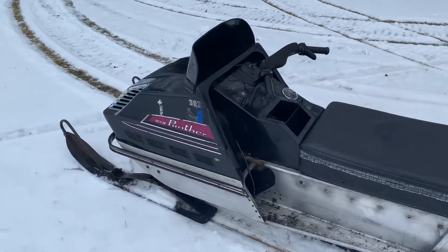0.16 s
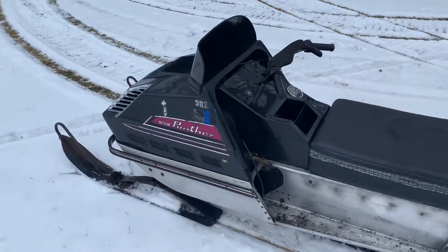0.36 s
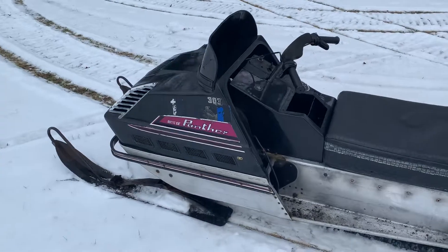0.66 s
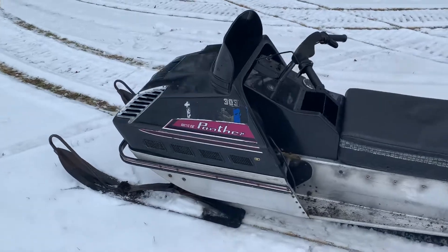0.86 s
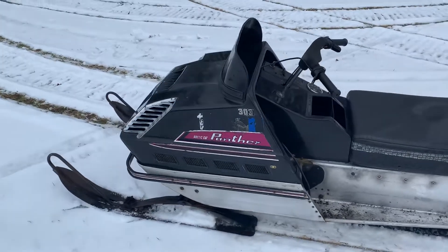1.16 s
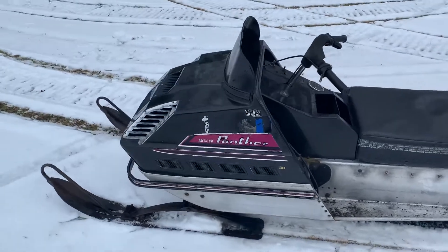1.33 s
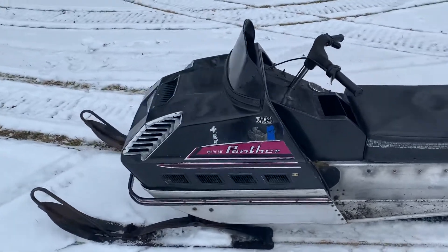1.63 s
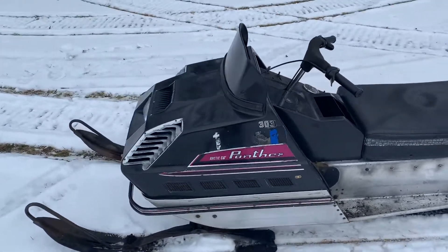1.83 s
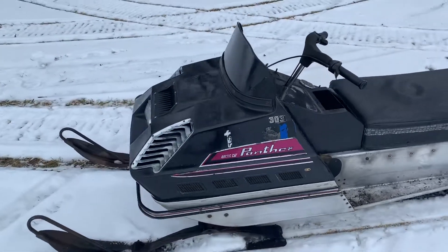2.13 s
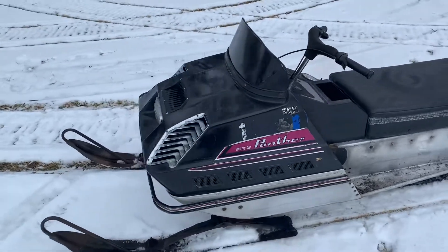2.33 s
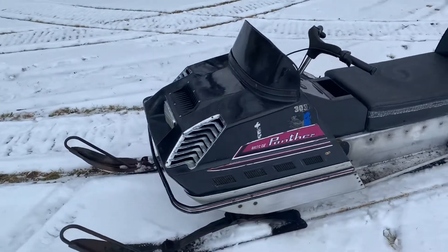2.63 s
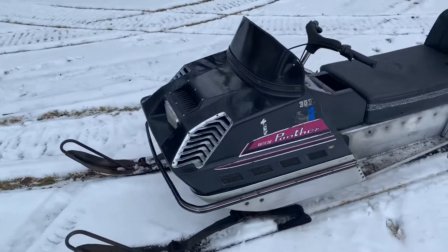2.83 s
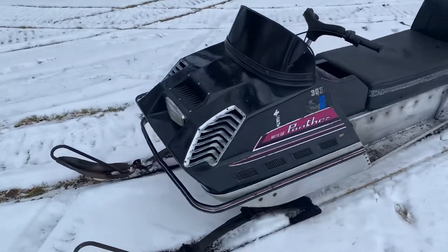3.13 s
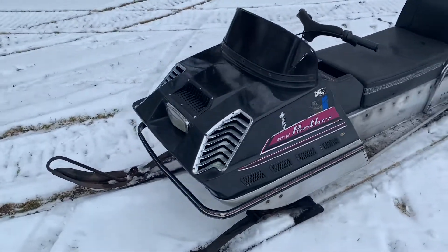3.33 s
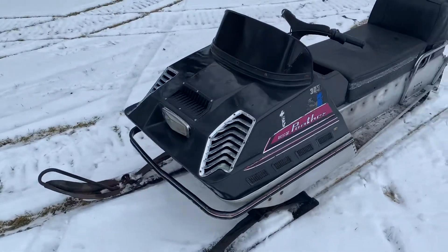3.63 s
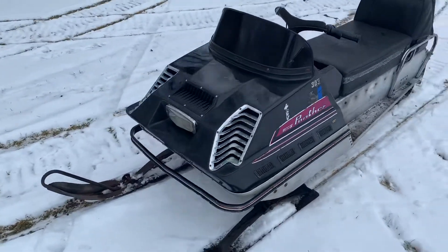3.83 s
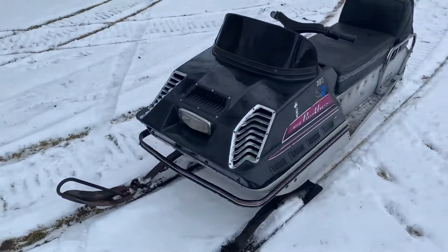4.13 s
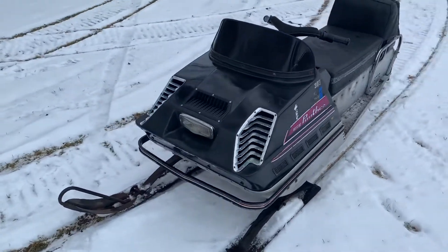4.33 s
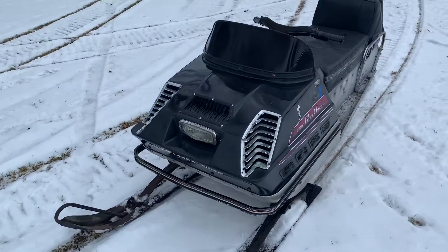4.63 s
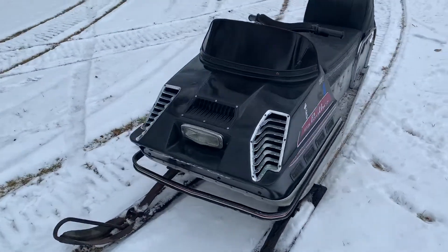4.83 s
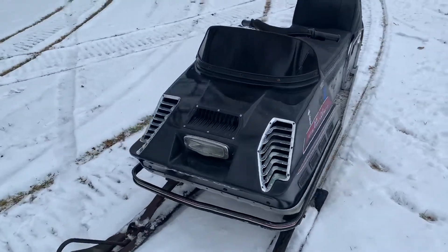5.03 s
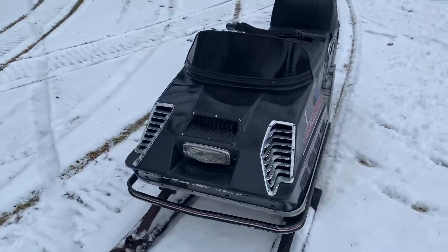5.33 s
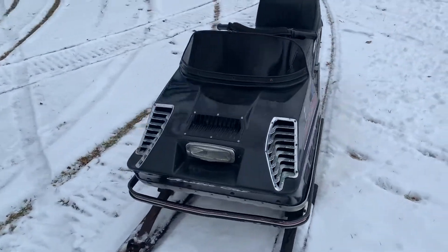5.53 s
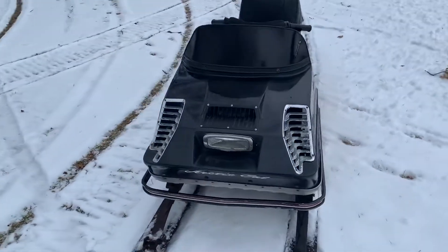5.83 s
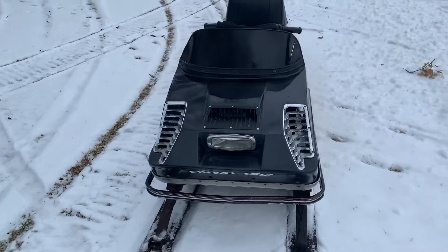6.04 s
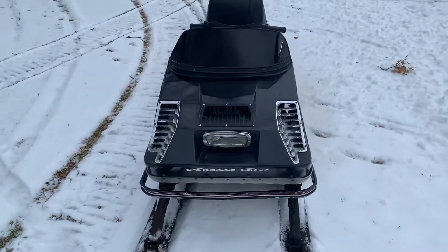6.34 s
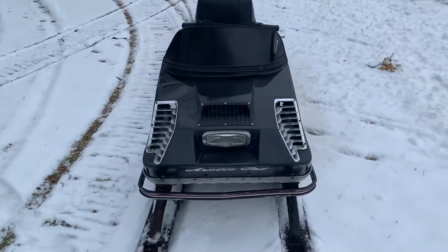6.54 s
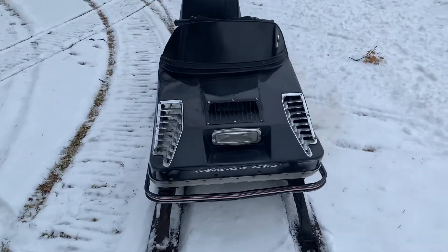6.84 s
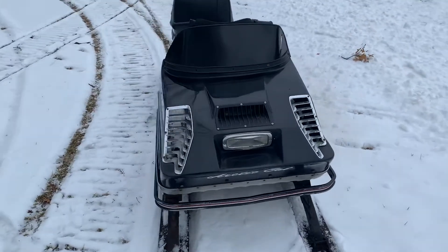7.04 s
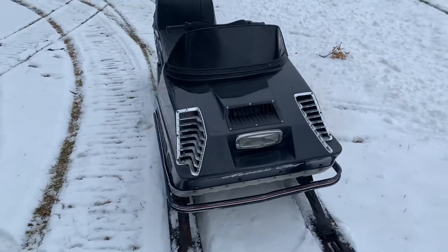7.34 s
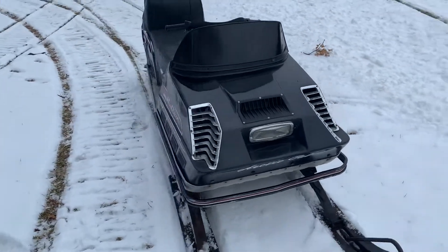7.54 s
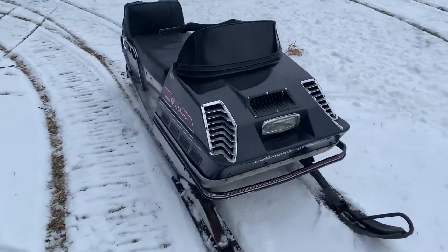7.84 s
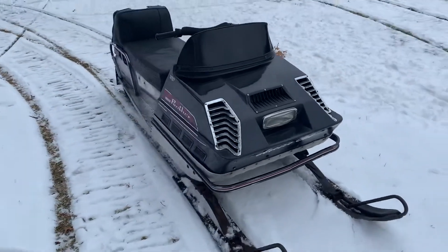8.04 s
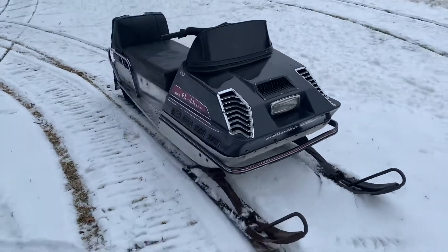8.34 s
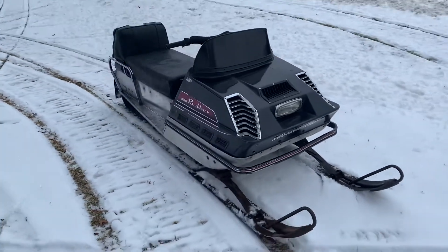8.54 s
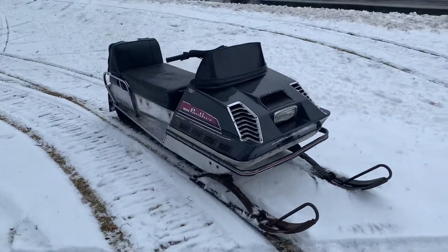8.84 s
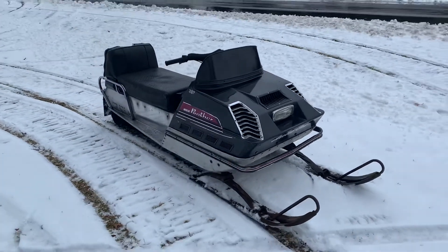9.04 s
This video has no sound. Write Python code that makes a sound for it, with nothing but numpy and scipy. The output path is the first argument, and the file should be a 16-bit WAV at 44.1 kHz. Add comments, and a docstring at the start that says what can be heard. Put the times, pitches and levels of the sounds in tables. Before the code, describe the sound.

A two-stroke snowmobile idles unevenly outdoors, firing in quick paired thumps with sharp exhaust cracks, rattling metal and a brief early wind gust.

```python
"""On open snow a two-stroke snowmobile idles while the listener walks round its nose with a stereo microphone.
The crank turns about 32 times a second, but the cylinder fires two or three turns in a row and then coasts.
Each firing rings the muffler with a thump and sends a sharp crack of gas out of the exhaust; coasting turns puff.
Hood and fins rattle in resonances knocked on every turn, a clutch plate sings in spells, the fan hisses,
a steady low rumble lies underneath, and an early gust of noise and popping eddies hits the microphone."""
import sys
import numpy as np
from scipy import signal
from scipy.fft import rfft, irfft
from scipy.io import wavfile
from scipy.ndimage import uniform_filter1d, map_coordinates

SR = 44100
rng = np.random.default_rng(int(sys.argv[2]) if len(sys.argv) > 2 else 0)


def transcribe(signal):
    """Save signal, clipped to [-1, 1], as a 16-bit WAV file at the path in sys.argv[1]."""
    frames = np.atleast_2d(signal).T
    limited = np.clip(frames, -1, 1)
    pcm = np.round(limited * 32767).astype(np.int16)
    wavfile.write(sys.argv[1], SR, pcm)


N = 404838
TIME_S = np.arange(N) / SR
TURN_S = .0315  # nominal time of one turn of the crank


def from_db(db):
    """Amplitude factor of a level in dB."""
    return 10 ** (np.asarray(db) / 20)


def rms_one(x):
    """Scale to an rms of 1, over both channels together."""
    return x / np.sqrt(np.mean(x ** 2) + 1e-20)


def in_time(rows):
    """Each column as a curve over all samples."""
    s, *columns = np.transpose(rows)
    return [np.interp(TIME_S, s, c) for c in columns]


def at_hz(rows, hz):
    """Each column read on a log-frequency axis."""
    points, *columns = np.transpose(rows)
    return [np.interp(np.log(hz + 1e-9), np.log(points), c) for c in columns]


def panned(left_db):
    """Gains of the left and right channel, left_db apart."""
    return from_db(np.array([[.5], [-.5]]) * left_db)


def two_channels(mid, side, alike):
    """Two channels that correlate by the given likeness, from two independent signals."""
    alike = np.clip(alike, 0, 1)
    return np.sqrt(1 + alike) * mid + np.sqrt(1 - alike) * side * [[1], [-1]]


def clicks(times, sizes):
    """Single-sample kicks."""
    out = np.zeros(N)
    samples = np.clip(np.round(times * SR).astype(int), 0, N - 1)
    np.add.at(out, samples, sizes)
    return out


def ring(kicks, hz, t60):
    """A unit kick sets a sine of about height 1 ringing, down 60 dB after t60 seconds."""
    r = np.exp(-np.log(1000) / (t60 * SR))
    w = 2 * np.pi * hz / SR
    return signal.lfilter([0, np.sin(w)], [1, -2 * r * np.cos(w), r * r], kicks + 1e-18)


def resonate(x, hz, width_hz):
    """A resonance with gain 1 on its top."""
    r = np.exp(-np.pi * width_hz / SR)
    zeros = np.array([1, 0, -1]) * (1 - r * r) / 2
    return signal.lfilter(zeros, [1, -2 * r * np.cos(2 * np.pi * hz / SR), r * r], x)


def wobble(per_s):
    """Random drift of rms 1, in straight lines between per_s knots a second."""
    knots = rng.standard_normal(int(N / SR * per_s) + 3)
    return rms_one(map_coordinates(knots, [np.arange(N) * per_s / SR], order=1))


def facing(at_s, spread_s):
    """Gain of a sound that beams one way, as the listener walks through its beam."""
    return np.exp(-.5 * ((TIME_S - at_s) / spread_s) ** 2)


# the two channels of the microphone: (frequency [Hz], likeness [0-1], left minus right [dB])
STEREO = [(60, 0.91, -1.5), (320, 0.87, -1.25), (704, 0.88, 3), (1160, 0.78, 3), (1710, 0.22, 5.5),
          (3020, 0.46, -0.5), (5770, 0.24, -4.5), (7600, 0.96, 1), (9700, 1, -0.5)]
# left channel delayed by this much above this frequency
TREBLE_LAG_S, TREBLE_FROM_HZ = .000178, 6500


def noise(spectrum):
    """Coloured stereo noise of rms 1; its treble is slightly delayed in the left channel."""
    hz = np.fft.rfftfreq(N, 1 / SR)
    alike, left_db = at_hz(STEREO, hz)
    mid, side = rfft(rng.standard_normal((2, N)))
    pair = two_channels(mid, side, alike)
    pair[0] *= np.exp(-2j * np.pi * hz * TREBLE_LAG_S * (hz > TREBLE_FROM_HZ))
    colour = from_db(at_hz(spectrum, hz)[0])
    return rms_one(irfft(pair * panned(left_db) * colour, N))


# spectrum of the low rumble: (frequency [Hz], relative density [dB per Hz])
RUMBLE_SPECTRUM = [(15, -40), (30, -38), (50, 2.5), (100, -1.5), (155, -0.5), (220, -4.5), (350, -16),
                   (550, -20), (1000, -78)]


def rumble(level_db=-23):
    """Low rumble: steady coloured noise."""
    return from_db(level_db) * noise(RUMBLE_SPECTRUM)


# eddies popping on the microphone: rate, level against the gust, cycles of ring down to -60 dB
EDDIES_PER_S, EDDY_DB, EDDY_CYCLES = 80, -3.5, 5.2


def eddies(low_hz=200, high_hz=640, scatter_db=2.0, tilt_db=-4.5, count=10):
    """Short dull pops at random times on a ladder of pitches, the higher ones weaker; rms 1."""
    out = 0
    for hz, height in zip(np.geomspace(low_hz, high_hz, count), np.linspace(0, 1, count)):
        born = rng.random(N) < EDDIES_PER_S / (count * SR)
        force = from_db(tilt_db * height + scatter_db * wobble(200))
        out = out + ring(born * force, hz, EDDY_CYCLES / hz)
    return rms_one(out)


# spectrum of the wind at the microphone: (frequency [Hz], relative density [dB per Hz])
WIND_SPECTRUM = [(25, -28), (60, 6), (110, -4.5), (300, 1), (450, -5.5), (700, -12.5), (1100, -23.5),
                 (2500, -45)]
# one gust swells, eases and drops: (time [s], level before lumps [dB])
GUST_LEVEL = [(0, -33.5), (.36, -20), (.84, -16.5), (.97, -22), (1.3, -21.5), (1.7, -25), (2, -70)]


def gust(lumps_db=2.5, left_db=4.5, rush_db=-1.0):
    """Wind rushes over the microphone and buffets it with eddies, more on the left."""
    air = from_db(rush_db) * noise(WIND_SPECTRUM) + from_db(EDDY_DB) * eddies()
    strength = from_db(in_time(GUST_LEVEL)[0] + lumps_db * wobble(55.2))
    return strength * air * panned(left_db)


# spectrum of the cooling fan: (frequency [Hz], relative density [dB per Hz])
FAN_SPECTRUM = [(300, 0.5), (550, -6), (900, 2.5), (1200, 2), (2100, 1), (3000, -5), (4200, -3.5),
                (5200, -13.5), (7000, -6.5), (8500, -7.5), (10500, -5), (13000, -18.5), (15500, -18)]
# the fan heard on the walk: (time [s], level before flutter [dB])
FAN_LEVEL = [(0, -31), (1.2, -36), (2.4, -32), (4.8, -31), (6.6, -34), (9.18, -32)]


def fan(flutter_db=1.15):
    """Cooling air and belt hiss: coloured noise with a fast flutter."""
    return from_db(in_time(FAN_LEVEL)[0] + flutter_db * wobble(280)) * noise(FAN_SPECTRUM)


def rattle(turns, modes, scatter_db, pan_db, count):
    """Loose metal knocks count times on every turn; each knock excites the modes anew; rms 1."""
    times = (turns[:, None] + TURN_S * rng.random((len(turns), count))).ravel()
    force_db = scatter_db * rng.standard_normal(len(times))
    out = 0
    for hz, mode_db, t60 in modes:
        alike, left_db = at_hz(STEREO, hz)
        mid, side = rng.standard_normal((len(times), 2)).T
        sizes = two_channels(mid, side, alike) * from_db(force_db + mode_db)
        kicks = np.array([clicks(times, channel) for channel in sizes])
        out = out + ring(kicks, hz, t60) * panned(left_db + pan_db)
    return rms_one(out)


# hood panels: (frequency [Hz], relative level [dB], t60 [s])
HOOD_MODES = [(631, -2.5, 0.069), (697.5, -2.5, 0.17), (729, -0.5, 0.16), (1079, -7.5, 0.092),
              (1367, -5, 0.044)]
# the hood panels heard on the walk: (time [s], level [dB])
HOOD_LEVEL = [(0, -31), (1.5, -36), (2.3, -35), (3.2, -42), (4.6, -32), (5.8, -34), (7.4, -31), (8.1, -38)]
# lower drone of the nose, heard only from the front: (frequency [Hz], relative level [dB], t60 [s])
NOSE_MODES = [(631, 0.5, 0.067), (679, 1, .06)]
# cooling fins: (frequency [Hz], relative level [dB], t60 [s])
FIN_MODES = [(1700, 1.5, 0.064), (1810, 1, 0.034), (1930, 3.5, 0.066), (2232, 7, 0.028),
             (2760, -1.5, 0.083), (2927, -0.5, 0.06), (3310, -9.5, 0.16)]
# the cooling fins heard on the walk: (time [s], level [dB])
FINS_LEVEL = [(0, -35.5), (2.2, -40.5), (4.9, -34.5), (5.8, -37.5), (6.6, -36.5), (7.9, -42.5),
              (9.18, -42.5)]


def clatter(turns, nose_db=-35.5):
    """Hood, nose and cooling fins rattle with every turn of the crank."""
    hood = rattle(turns, HOOD_MODES, scatter_db=1.5, pan_db=-2.0, count=6)
    nose = rattle(turns, NOSE_MODES, scatter_db=1.0, pan_db=-2.0, count=6)
    fins = rattle(turns, FIN_MODES, scatter_db=2.5, pan_db=-1.0, count=8)
    hood = from_db(in_time(HOOD_LEVEL)[0]) * hood
    nose = from_db(nose_db) * facing(at_s=7.1, spread_s=0.67) * nose
    fins = from_db(in_time(FINS_LEVEL)[0]) * fins
    return hood + nose + fins


# spells in which a clutch plate sings: (start [s], end [s], level before flutter and choking [dB])
CLUTCH_SPELLS = [(0, 0.885, -37), (1.696, 2.3, -37), (2.793, 3.015, -31.5), (3.293, 3.753, -35.5),
                 (4, 7.4, -43)]
# the singing swells and fades at this rate round each spell
CLUTCH_FADE_DB_PER_S = 59


def clutch(jet, hz=1826, waver_hz=13, flutter_db=3.0, choke=18, left_db=6.0):
    """The belt rubs a plate into a wavering ring, choked by the jerk of each firing."""
    spells = []
    for start, end, level_db in CLUTCH_SPELLS:
        outside_s = abs(TIME_S - np.clip(TIME_S, start, end))
        spells.append(level_db - CLUTCH_FADE_DB_PER_S * outside_s)
    spells_db = np.max(spells, axis=0)
    phase = 2 * np.pi * np.cumsum(hz + waver_hz * wobble(90)) / SR
    slack = 1 / (1 + choke * uniform_filter1d(jet, size=1300))  # averaged over about 29 ms
    return from_db(spells_db + flutter_db * wobble(60)) * slack * np.sin(phase) * panned(left_db)


# speed of the crank, hunting round its idle: (time [s], speed [turns per minute])
CRANK_SPEED = [(0.0, 1894), (0.44, 1894), (0.69, 2001), (1.47, 1889), (2.12, 1986), (2.57, 1942),
               (2.77, 2000), (3.78, 1934), (3.9, 1873), (4.82, 2003), (5.09, 1933), (6.32, 2018),
               (6.44, 1932), (7.41, 1838), (7.63, 1940), (7.76, 1810), (7.98, 1939), (9.18, 1982)]
FIRST_TURN_S = .0096


def crank_turns():
    """Times at which the piston opens the exhaust port, once a turn."""
    angle = np.cumsum(in_time(CRANK_SPEED)[0]) / (60 * SR)  # in turns
    angle = angle - np.interp(FIRST_TURN_S, TIME_S, angle)
    return np.interp(np.arange(0, angle[-1]), angle, TIME_S)


# cycles in which the engine stumbles:
# (time [s], firing turns [count], coasting turns [count], charge of the last firing [dB])
STUMBLES = [(.01, 3, 3, 0), (.2, 3, 3, 0), (.85, 2, 4, 0), (3.49, 3, 3, -1), (3.67, 3, 3, 0),
            (3.86, 3, 3, 0), (4.97, 3, 2, -6), (6.81, 3, 3, -2), (7, 3, 3, 0), (7.19, 3, 2, -9),
            (7.35, 3, 3, 0), (7.55, 3, 2, -5), (8.94, 3, 3, -11)]
# the idle cycle: turns that fire, then turns that coast
FIRE_TURNS, COAST_TURNS = 2, 3


def charges(turns):
    """Charge burnt on each turn in dB, none while coasting: the idle cycle repeats unless the engine stumbles."""
    out = []
    while len(out) < len(turns):
        now_s = turns[len(out)]
        stumble = [row[1:] for row in STUMBLES if abs(row[0] - now_s) < TURN_S]
        fire, coast, last_db = stumble[0] if stumble else (FIRE_TURNS, COAST_TURNS, 0)
        out += [0] * (fire - 1) + [last_db] + [-np.inf] * coast
    return np.array(out[:len(turns)])


def jets(fired, crack_db, peak_s=0.0027, width_s=0.0012, tail=0.86, linger_s=.0062, sputter_db=2.0):
    """Strength of the gas jet from the exhaust port: a brief sputtering burst that lingers under the hood."""
    t = np.arange(SR // 10) / SR
    burst = np.exp(-.5 * ((t - peak_s) / width_s) ** 2)
    linger = tail * np.exp(-t / linger_s) * (1 - np.exp(-(t / peak_s) ** 2))
    flow = signal.oaconvolve(clicks(fired, from_db(crack_db)), np.hypot(burst, linger))[:N]
    return flow * from_db(sputter_db * wobble(900))


# spectrum of the exhaust jet: (frequency [Hz], relative density [dB per Hz])
CRACK_SPECTRUM = [(500, 12), (900, 4.5), (1300, -3), (2300, 2), (3200, 2), (3800, 0.5), (5200, -4.5),
                  (7400, 1.5), (8800, 1.5), (10800, -1), (13000, -6.5), (15500, -2.5)]
# exhaust resonances that beam past the listener on the walk:
# (frequency [Hz], width [Hz], level among the beams [dB], loudest at [s], spread [s])
BEAMS = [(1750, 300, -12, 0.21, 1.9), (1670, 150, -10, 7, 2.4), (2150, 530, -18, 3.4, 0.58),
         (2030, 840, -5.5, 6.88, 0.9), (3310, 220, -10, 3.9, 0.57), (3360, 270, -13.5, 1.3, 0.23),
         (5470, 1330, -13.5, 0.78, 0.66), (7330, 540, -10.5, 3.16, 0.95), (7260, 670, -6, 6.85, 0.34),
         (9100, 410, -14, 1.2, 0.52)]


def crack(jet, broad_db=-4, beam_db=-3, flicker_db=0.7):
    """The jet roars broadly and sings in flickering resonances, each heard best at one point of the walk."""
    roar = noise(CRACK_SPECTRUM)
    out = from_db(broad_db) * roar
    for hz, width_hz, level_db, at_s, spread_s in BEAMS:
        tone = rms_one(resonate(resonate(roar, hz, width_hz), hz, 2 * width_hz))
        gain = from_db(beam_db + level_db + flicker_db * wobble(25))
        out = out + gain * facing(at_s, spread_s) * tone
    return jet * out


def reflected(x, strength=0.51, count=5):
    """Adds short echoes; their path lengths drift, so the colour keeps shifting."""
    n = np.arange(N)
    out = x
    for k, delay_s in enumerate(np.geomspace(.0012, .005, count)):
        path = delay_s * SR * np.exp(.1 * wobble(.7))  # in samples
        late = np.array([map_coordinates(channel, [n - path], order=3) for channel in x])
        out = out + (-1) ** k * strength * late / np.sqrt(1 + k / 2)
    return out


def pipe(times, level_db, modes, scatter_db, bite_db=0, bite_hz=500):
    """Pressure pulses ring the pipe modes in alternating sign; bite_db lifts the modes above bite_hz."""
    out = 0
    for k, (hz, mode_db, t60) in enumerate(modes):
        chance_db = scatter_db * rng.standard_normal(len(times))
        sizes = from_db(level_db + mode_db + bite_db * (hz > bite_hz) + chance_db)
        out = out - (-1) ** k * ring(clicks(times, sizes), hz, t60) * panned(at_hz(STEREO, hz)[1])
    return out


# muffler struck by a firing: (frequency [Hz], level [dB], t60 [s])
MUFFLER_MODES = [(69.9, -9.5, 0.19), (115.3, 4, 0.03), (142.6, 2, 0.069), (210.5, -2, 0.034),
                 (312.2, -2.5, 0.033), (410.5, -9, 0.024), (604.5, -7.5, 0.013), (650, -0.5, 0.0053),
                 (927, -8.5, 0.014)]
# air pumped on a turn that does not fire: (frequency [Hz], level [dB], t60 [s])
PUMPING_MODES = [(67, -17, 0.082), (101, -7.5, 0.014), (136, -11.5, 0.087), (162.8, -21.5, 0.15)]
# the exhaust on the walk away from its outlet: (time [s], thump [dB], crack [dB])
EXHAUST_LEVEL = [(0, -0.6, -12), (1.3, -0.7, -12), (2.1, 0.6, -10.5), (3.2, 0, -11.5), (4.1, -1.04, -14.5),
                 (5.7, 0, -16), (7.6, -1.9, -19.5), (8.3, -2.5, -16.5), (9.18, -2.5, -17.5)]
# chance spread of the crack from firing to firing; share of a lean charge's loss that the thump takes
CRACK_SCATTER_DB, THUMP_FOLLOWS = 1.0, 0.44
# the upper muffler modes gain this many dB per dB of crack, and per dB of nearness to the outlet
BITE_PER_CRACK, BITE_PER_NEAR = 0.17, 2.0
# pumped air leaves the port this long after the turn
PUFF_LAG_S = .003


def exhaust(turns, charge_db):
    """The muffler thumps on each firing and puffs on each coasting turn; also gives the strength of the gas jet."""
    fires = np.isfinite(charge_db)
    fired, coasted, burnt_db = turns[fires], turns[~fires], charge_db[fires]
    near_db, sharp_db = (np.interp(fired, TIME_S, level) for level in in_time(EXHAUST_LEVEL))
    crack_db = sharp_db + burnt_db + CRACK_SCATTER_DB * rng.standard_normal(len(fired))
    bite_db = BITE_PER_CRACK * (crack_db - np.mean(crack_db)) + BITE_PER_NEAR * near_db
    thump_db = near_db + THUMP_FOLLOWS * burnt_db
    thumps = pipe(fired, thump_db, MUFFLER_MODES, scatter_db=0.54, bite_db=bite_db)
    puffs = pipe(coasted + PUFF_LAG_S, 0, PUMPING_MODES, scatter_db=0.5)
    return thumps + puffs, jets(fired, crack_db)


# a firing kicks the crank, so the next turn comes this much early
KICK_S = .0005


def scene():
    """Low rumble, wind, engine clatter and exhaust in the open air."""
    turns = crank_turns()
    charge_db = charges(turns)
    after_firing = np.r_[False, np.isfinite(charge_db[:-1])]
    turns = turns - KICK_S * after_firing
    muffler, jet = exhaust(turns, charge_db)
    air = fan()
    # the crack gets the full short echoes, the fan hiss only a mild share
    crack_and_fan = reflected(crack(jet) + .3 * air) + .7 * air
    return rumble() + gust() + clatter(turns) + clutch(jet) + crack_and_fan + muffler


def record(dry, low_hz=32, ceiling=0.85, cutoff_hz=16000):
    """The deepest bass is lost, the highest peaks are rounded and the top is cut."""
    lean = signal.sosfilt(signal.butter(2, low_hz, "high", fs=SR, output="sos"), dry)
    rounded = lean / (1 + (lean / ceiling) ** 8) ** (1 / 8)
    return signal.sosfilt(signal.ellip(12, .1, 80, cutoff_hz, fs=SR, output="sos"), rounded)


dry = scene()
out = record(dry)
transcribe(out)
```